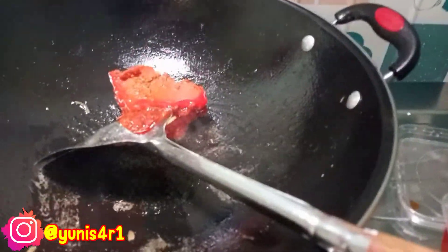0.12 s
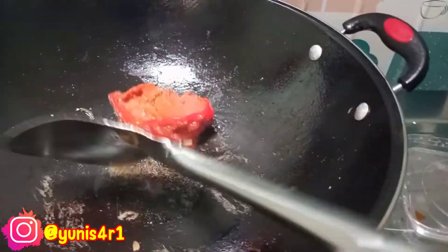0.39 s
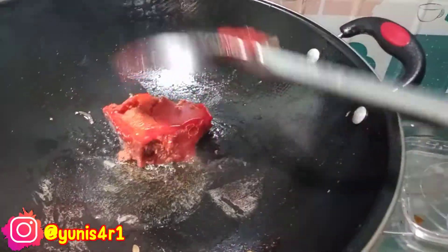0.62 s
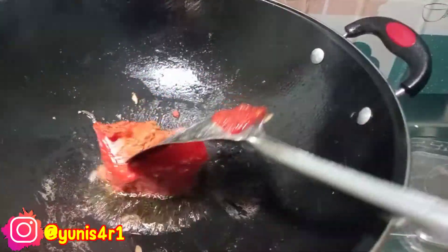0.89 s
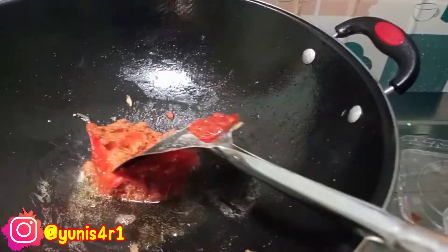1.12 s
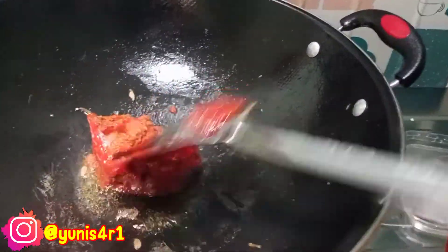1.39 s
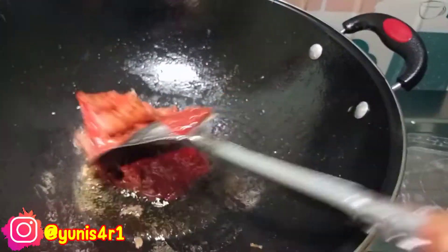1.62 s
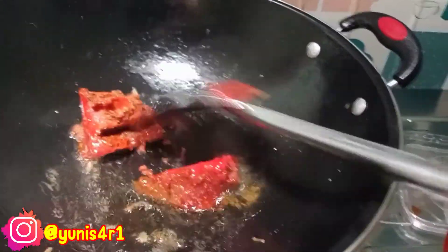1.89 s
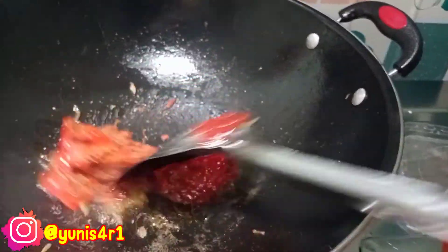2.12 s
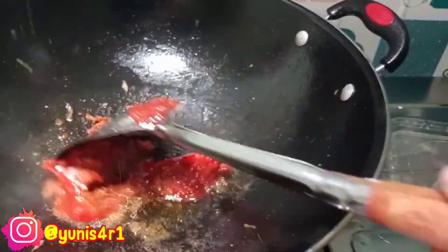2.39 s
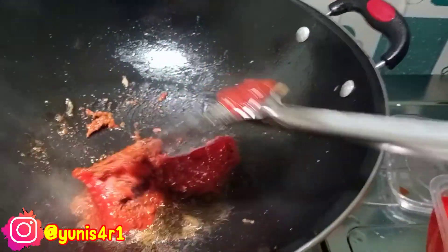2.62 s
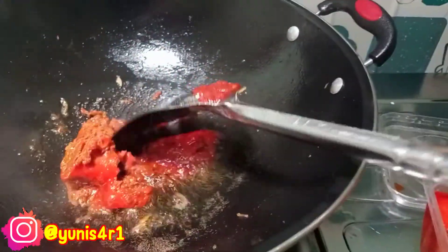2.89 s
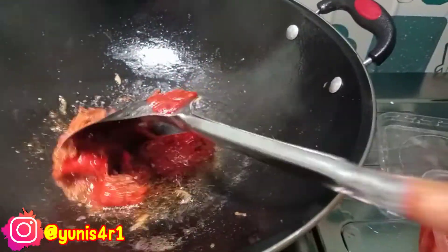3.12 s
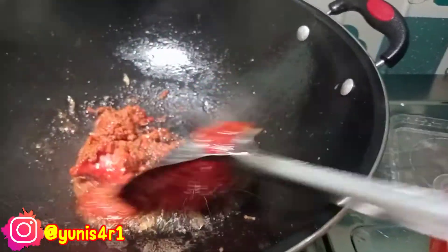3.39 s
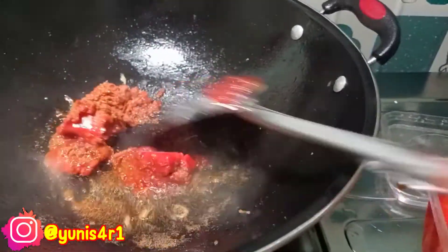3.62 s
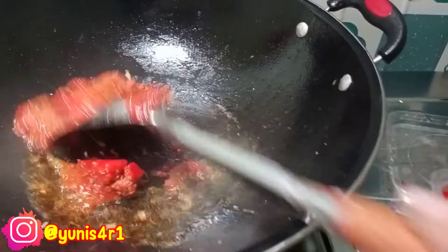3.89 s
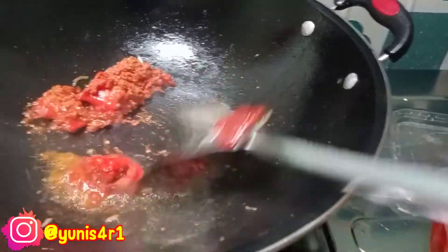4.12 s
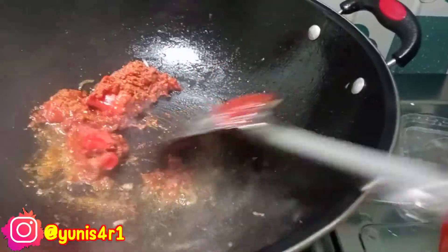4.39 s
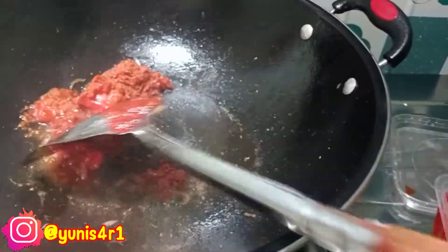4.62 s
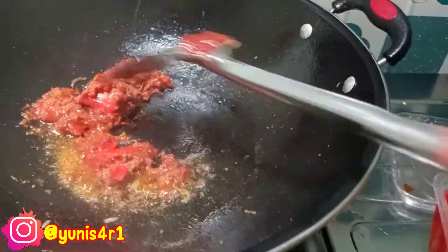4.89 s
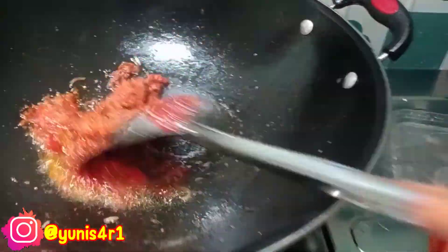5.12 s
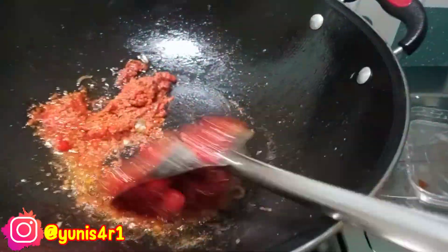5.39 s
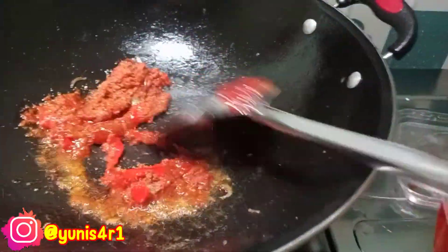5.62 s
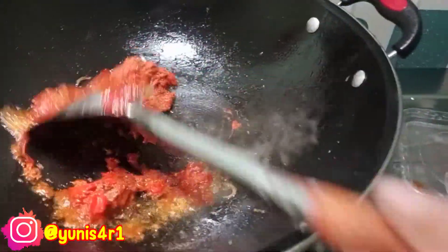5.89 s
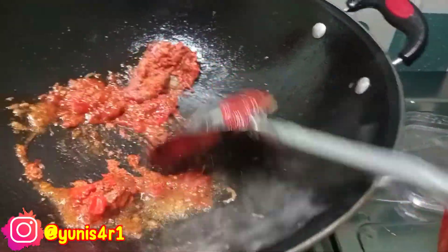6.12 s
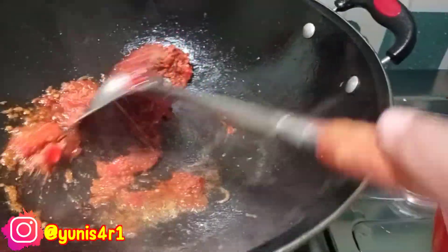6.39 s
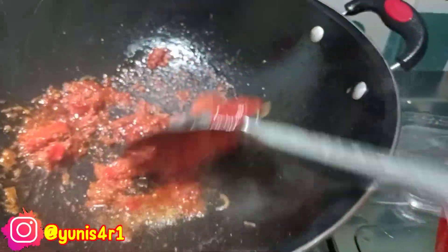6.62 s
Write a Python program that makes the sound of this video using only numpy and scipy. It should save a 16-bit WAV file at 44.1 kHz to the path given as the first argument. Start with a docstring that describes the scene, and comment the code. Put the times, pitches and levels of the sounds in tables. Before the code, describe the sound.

Wet spice paste fries hard in hot oil very close to a phone microphone, a dense bright hiss with sharp snapping spatters. A metal spatula scrapes in short gritty strokes that make the bubbling surge, and occasionally knocks the wok with a brief damped ring. The pan bumps softly on its stand; low burner rumble lies underneath in a small kitchen.

```python
"""Spice paste frying in a wok

Hot oil sizzles close to a phone microphone: noise and damped sines for bursting steam bubbles in three sizes,
with sharp noise cracks for spatters. A metal spatula scrapes coloured grit noise, squeaks, clanks and knocks
the ringing modes of a steel wok, which bumps on its stand. Puffs of steam and some loud spatters push the
microphone, and faint hums and burner rumble lie behind it all. The blows and spatters echo in a small kitchen."""
import sys
import numpy as np
from scipy import signal
from scipy.fft import rfft, irfft, next_fast_len
from scipy.io import wavfile
from scipy.ndimage import uniform_filter1d, minimum_filter1d, map_coordinates

SR = 44100
rng = np.random.default_rng(int(sys.argv[2]) if len(sys.argv) > 2 else 0)


def log_audio(samples):
    """Write samples as a 16-bit WAV file to the path given in sys.argv[1]."""
    # one column per channel
    frames = np.atleast_2d(samples).T
    # limit to full scale, then quantise
    limited = np.clip(frames, -1, 1)
    pcm = np.round(limited * 32767).astype(np.int16)
    wavfile.write(sys.argv[1], SR, pcm)


def volts_from_db(level):
    """Convert decibel levels to linear amplitude ratios."""
    exponent = np.asarray(level, float) / 20
    return 10 ** exponent


N = 298069  # length in samples

# Levels in the tables are relative: each source trims its own.
# Burner and kitchen noise over time: time_s, level_db
RUMBLE_LEVELS = [(0.0, -51), (0.56, -47), (1.39, -52), (2.05, -48), (2.8, -53.5), (3.54, -45), (4.1, -49.5),
                 (6.57, -48.5), (6.76, -53)]
# Colour of the burner and kitchen noise: frequency_hz, level_db
KITCHEN_COLOUR = [(24, -60), (45, -22.5), (234, -2), (355, -5), (406, 1.5), (470, -4), (734, 0.5),
                  (862, -5), (1000, 0), (1300, -8.5), (2200, -120)]
# Faint hums: start_s, length_s, pitch_hz, level_db
HUM_TONES = [(4.45, .09, 689, -38.5), (4.53, 0.24, 794, -44), (5.758, .1, 798, -45)]
# Kitchen reverberation: frequency_hz, t60_s
ROOM_DECAY = [(200, 0.65), (2000, 0.3), (10000, 0.063)]
# The wok rocks on its stand: start_s, level_db
ROCK_BUMPS = [(.363, -44), (.419, -47), (0.578, -41), (.799, -40), (2.124, -40), (2.994, -40), (3.145, -39),
              (3.327, -35.5), (3.42, -37), (3.697, -39), (3.823, -32.5), (4.317, -40), (4.474, -41),
              (4.851, -29), (5.181, -42), (5.622, -40), (5.83, -37), (6.112, -29), (6.34, -35),
              (6.423, -38), (6.551, -38)]
# Low pushes of air on the microphone: puffs of steam, and the low thump under some loud spatters (the shortest
# rows): start_s, level_db, scale_s (the first push lasts half of it)
MIC_PUFFS = [(0.384, -38, 0.0067), (2.257, -33, 0.006), (2.419, -23.5, 0.0046), (2.469, -37, 0.006),
             (3.402, -50, 0.006), (3.825, -33, 0.0044), (5.5795, -26.5, 0.0019), (5.7093, -27, 0.0022),
             (6.461, -27, 0.0012), (6.649, -17, 0.0043), (6.697, -30, 0.0015)]
# Modes of the wok: pitch_hz, level_db, t60_s
WOK_MODES = [(204, -19, .12), (245.4, -8.5, 0.8), (323, -5, 0.27), (357.4, -5.5, 0.25), (402, -6, 0.46),
             (544, -7.5, 0.28), (641, -5.5, 0.28), (718, -4.5, 0.22), (750, -8.5, 0.14), (925, -24, .15),
             (1155, -20, .12), (1340, -13, 0.089), (1410, -3, 0.096), (1634, -1, .08), (2738, 12.5, 0.052),
             (2980, -16, .06), (3400, 0, .05), (4250, 4, .04)]
# Spatula knocks: start_s, level_db, sharpness (0 blunt to 1 sharp)
SPATULA_KNOCKS = [(0.004, -29.5, 0.6), (0.237, -38, 0.7), (0.347, -38, 0.7), (1.132, -36, 0.9),
                  (1.244, -33, 0.5), (1.896, -37, 0.7), (1.989, -25, 0.6), (2.406, -19.5, 0.55),
                  (2.421, -28.5, 0.4), (2.78, -21.5, 0.3), (3.662, -31, 0.9), (3.868, -30, 0.4),
                  (4.759, -19.5, 0.4), (5.088, -37, 0.9), (5.445, -29.5, 0.8), (6.047, -37, 0.7),
                  (6.117, -28, 0.2)]
# Blade clanks, pitched by how the blade lies in the paste: start_s, level_db, lower_hz, upper_hz
BLADE_CLANKS = [(1.1343, -6.5, 2020, 3070), (2.4073, -3, 1920, 2380), (2.782, -0.5, 1535, 3230),
                (3.6603, -13.5, 1980, 2970), (4.7603, -3.5, 1650, 2780)]
# Strokes of the blade: start_s, hold_s, scrape_db, surge_db (swell of the coarse bubbling)
BLADE_STROKES = [(0.338, 0.039, -35, 2.5), (0.442, .075, -44, 2.5), (0.748, 0.034, -42, 4),
                 (0.8, 0.042, -29.5, 2), (1.116, 0.035, -43, 0), (1.282, 0.021, -49, 0.5),
                 (1.555, 0.027, -37, 1), (1.655, 0.076, -37, 4), (1.772, 0.076, -32, 3),
                 (2.074, 0.076, -40, 2), (2.788, 0.051, -48, 2.5), (3.327, 0.11, -35, 1),
                 (3.65, 0.037, -37, -1), (3.764, .14, -39, 0), (4.194, 0.054, -48, 2), (4.64, 0.14, -41, 2),
                 (5.162, 0.085, -34, 2), (5.38, 0.044, -40, 0.5), (5.75, 0.088, -37.5, 3),
                 (6.163, 0.13, -45, 3)]
# Short squeaks of the blade: start_s, level_db, pitch_hz
BLADE_SQUEAKS = [(1.809, -16, 1526), (4.415, -18, 1536), (5.797, -19, 1496)]
# Colour of the scrape: frequency_hz, level_db
SCRAPE_COLOUR = [(470, -39), (800, -22), (1170, -11), (1350, -13), (1520, -7.5), (2190, -8), (2400, -1.5),
                 (3120, -27.5), (5280, -120)]
# The loudest oil spatters: start_s, level_db, bubbling_part_db, spray_part_db
LOUD_SPATTERS = [(0.273, -8, -8, -21), (0.3375, -5, -20, -27), (0.39, -8, -6, -23), (0.4479, -7, -5, -25),
                 (0.579, -1, -16, -27), (0.6644, -7, -12, -24), (0.9347, -9, -2, -26),
                 (0.9941, -11, -19, -21), (1.2251, -6, -11, -20), (1.6344, -6, -16, -20),
                 (2.0902, -1, -7, -26), (2.2558, -6, -12, -24), (2.3007, -13, -7, -22),
                 (2.3785, -11, -18, -17), (2.4083, -11, -2, -23), (2.4692, -1, -8, -19),
                 (2.5104, -2, -9, -22), (2.6075, -4, -11, -23), (2.7257, -7, -11, -20),
                 (2.7823, -5, -1.5, -24), (2.806, -4, -10, -19), (3.0261, -10, -4, -22),
                 (3.0615, -13, -4, -24), (3.3824, -9, -18, -21), (3.6631, -6, -21, -20),
                 (3.7439, -10, -17, -17), (3.8708, -1, -14, -25), (4.76, -9, -9.5, -23),
                 (4.9683, -12, -18, -20), (4.9996, -9, -13, -25), (5.0664, -8, -12, -21),
                 (5.4336, -2, -13, -26), (5.5807, -9, -7, -22), (5.7094, -2.5, -11, -23),
                 (5.9548, -2, -24, -25), (6.064, -3, -20, -25), (6.1864, -1, -15, -25),
                 (6.393, -5.5, -13.5, -24), (6.4603, -4, -18, -13), (6.4974, -4, -22, -18),
                 (6.5184, -6, -17, -17), (6.542, 0, -22, -20), (6.6484, -2.5, -13, -25),
                 (6.6542, -5.5, -19, -20), (6.698, -4, -22, -19)]
# How hard each size of bubble fries: time_s, coarse_bubbling_db, fine_hiss_db, spray_db
FRY_LEVELS = [(0.0, -19, -21, -29), (0.02, -19.5, -21, -32), (0.49, -20, -22, -32),
              (1.24, -22, -24.5, -33.5), (1.52, -22, -24.5, -35), (1.65, -19, -19, -31),
              (1.81, -25, -21.5, -32), (1.92, -20, -19.5, -25), (2.16, -18.5, -17.5, -26.5),
              (2.33, -20.5, -19.5, -29), (2.37, -23, -24.5, -32), (2.86, -23, -20, -28),
              (3.11, -25, -24.5, -32), (3.5, -20, -18, -28.5), (3.84, -23, -19, -25),
              (3.88, -23, -21.5, -33), (4.18, -23, -23, -30), (4.25, -23, -23, -35),
              (4.59, -23, -20.5, -29), (4.89, -25.5, -23.5, -32.5), (5.18, -25, -25, -36),
              (5.33, -20.5, -20, -30), (5.48, -22, -17.5, -28), (5.74, -25, -24, -32),
              (5.85, -23.5, -20.5, -31), (6.65, -29, -24.5, -35), (6.7, -25.5, -24, -30),
              (6.76, -27.5, -25, -30)]
# Colour of the coarse bubbling: frequency_hz, level_db
BUBBLING_COLOUR = [(1180, -38), (2000, -12.5), (3300, 1.5), (4140, -2), (5050, -13), (5600, -14),
                   (7280, -14.5), (12300, -120)]
# Colour of the fine hiss: frequency_hz, level_db
HISS_COLOUR = [(2940, -32.5), (5000, -24), (5910, -12), (8230, 1), (11500, -15.5), (15000, -45),
               (22000, -120)]
# Colour of the spray: frequency_hz, level_db
SPRAY_COLOUR = [(6500, -34), (11000, 7.5), (12800, 3.5), (14900, 9), (15450, 13), (15600, -60),
                (22000, -67)]


def unit(x):
    """Scale to rms 1."""
    return x / np.sqrt(np.mean(x ** 2) + 1e-20)


def along(points, hz):
    """Read a (frequency_hz, value) curve on a log frequency axis."""
    f, v = np.transpose(points)
    return np.interp(np.log(hz + 1), np.log(f + 1), v)


def curves(rows):
    """One value per sample for each column after the time."""
    s, *columns = np.transpose(rows)
    return [np.interp(np.arange(N) / SR, s, column) for column in columns]


def wobble(rate):
    """A smooth random curve with this many knots a second."""
    knots = rng.standard_normal(int(N * rate / SR) + 4)
    return map_coordinates(knots, [np.arange(N) * rate / SR])


def coloured(x, spectrum):
    """Shape x with a causal minimum-phase filter that leaves the power of white noise as it is."""
    m = 2 * next_fast_len(N // 2 + 4096)
    gain = np.maximum(volts_from_db(along(spectrum, np.fft.rfftfreq(m, 1 / SR))), 1e-4)
    cepstrum = irfft(np.log(unit(gain)), m)
    # folding the cepstrum forward makes the filter causal
    cepstrum[1:m // 2] *= 2
    cepstrum[m // 2 + 1:] = 0
    return irfft(rfft(x, m) * np.exp(rfft(cepstrum)), m)[:N]


def bubbles(low_hz, high_hz, cycles, spread_db, count):
    """Bursting bubbles: damped sines of random pitch, mostly small, a few large."""
    when, pitch, size = rng.random((count, 3)).T
    hz = low_hz * (high_hz / low_hz) ** pitch
    t = np.arange(int(3 * cycles / low_hz * SR)) / SR
    turns = np.outer(hz, t)
    loudness = hz * volts_from_db(-spread_db * np.log(1 - .98 * size))  # the factor hz keeps the sum white
    grains = loudness[:, None] * np.sin(2 * np.pi * turns) * np.exp(-2 * turns / cycles)
    at = (when * N).astype(int)[:, None] + np.arange(len(t))
    return unit(np.bincount(at.ravel(), grains.ravel())[:N])


def froth(patchy_db):
    """White noise with patches of random gain: the bubbles too many to tell apart."""
    z = signal.stft(rng.standard_normal(N), nperseg=256)[2]
    field = uniform_filter1d(rng.standard_normal(z.shape), 5, 0)  # smooth over frequency
    field = uniform_filter1d(field, 9, 1)  # then over time
    return unit(signal.istft(z * volts_from_db(patchy_db * unit(field)), nperseg=256)[1][:N])


def place(times, sounds):
    """Sum of the sounds, each starting at its time."""
    out = np.zeros(N + SR)
    for s, sound in zip(times, sounds):
        out[round(s * SR):][:len(sound)] += sound
    return out[:N]


def rumble():
    """Burner and kitchen noise: patchy noise, strongest in the lows and mids, with an uneven level."""
    level_db = curves(RUMBLE_LEVELS)[0] + 3 + 0.84 * wobble(4.1) + 2.24 * wobble(12)
    return volts_from_db(level_db) * unit(coloured(froth(1.3), KITCHEN_COLOUR))


def hums():
    """Faint steady sines that swell and stop."""
    t = np.arange(N) / SR
    fade_s = 0.034
    mix = 0
    for s, length, hz, db in HUM_TONES:
        shape = np.clip(np.minimum(t - s, s + length - t) / fade_s, 0, 1)
        mix = mix + volts_from_db(db) * shape * np.sin(2 * np.pi * hz * t)
    return mix


def kitchen(x):
    """Echo from the walls: a noise tail in which each frequency dies at its own speed."""
    hz, t, z = signal.stft(rng.standard_normal(SR // 2), SR, nperseg=256)
    fading = volts_from_db(-60 * t / along(ROOM_DECAY, hz)[:, None])
    tail = signal.istft(z * fading, SR, nperseg=256)[1]
    delayed = np.pad(x, (250, 0))  # samples before the first echo
    return signal.fftconvolve(delayed, tail / np.linalg.norm(tail))[:N]


def rocking():
    """Soft bumps against the stand ring one low mode, its pitch a little different each time."""
    t = np.arange(SR // 3) / SR
    mode_hz, scatter_hz, t60_s, rise_s = 242, 6.1, 0.15, 0.0085
    bumps = []
    for _, db in ROCK_BUMPS:
        shape = volts_from_db(db + 4.5 - 60 * t / t60_s) * (1 - np.exp(-t / rise_s))
        bumps.append(shape * np.sin(2 * np.pi * rng.normal(mode_hz, scatter_hz) * t))
    return place(np.transpose(ROCK_BUMPS)[0], bumps)


def puffs():
    """Steam, or a loud spatter, gives the microphone a low push of air, then a slower, dying rebound."""
    t = np.arange(SR // 10) / SR
    pushes = []
    for _, db, scale in MIC_PUFFS:
        swing = np.sin(np.pi * np.sqrt(2 * t / scale))
        pushes.append(volts_from_db(db + 3.5) * swing * np.exp(-t / (0.6 * scale)))
    return place(np.transpose(MIC_PUFFS)[0], pushes)


def knocks():
    """Every blow rings the wok's modes at new strengths; a blunt blow leaves the upper modes weak."""
    t = np.arange(SR // 2) / SR
    hz, level, t60 = np.transpose(WOK_MODES)[:, :, None]
    rise = 1 - np.exp(-t / 0.0016)
    rings = []
    for _, db, sharp in SPATULA_KNOCKS:
        tilt_db = -9 * (1 - sharp) * np.log2(np.maximum(hz / 800, 1))
        strengths = db - 13.5 + level + tilt_db + rng.normal(0, 1.86, hz.shape)
        fading = volts_from_db(-60 * t / t60) + 4.6 * volts_from_db(-60 * t / 0.033)  # the paste damps the first swing fast
        modes = volts_from_db(strengths) * fading * np.sin(2 * np.pi * hz * t)
        rings.append(np.sum(modes, axis=0) * rise)
    return place(np.transpose(SPATULA_KNOCKS)[0], rings)


def clanks():
    """The blade itself clanks with some of the knocks: two tones that die together."""
    t = np.arange(SR // 20) / SR
    fading = volts_from_db(-60 * t / .03)  # t60 of 30 ms
    rings = []
    for _, db, low_hz, high_hz in BLADE_CLANKS:
        tones = 0.46 * np.sin(2 * np.pi * low_hz * t) + np.sin(2 * np.pi * high_hz * t)
        rings.append(volts_from_db(db - 6.5) * fading * tones)
    return place(np.transpose(BLADE_CLANKS)[0], rings)


def strokes():
    """Scrape gain and surge of the bubbling in dB: each stroke rises, holds and lets go."""
    attack_s, release_s = 0.0082, 0.053
    gain, surge_db, t = 0, 0, np.arange(N) / SR
    for s, hold, db, stroke_surge_db in BLADE_STROKES:
        shape = np.interp(t, s + np.cumsum([0, attack_s, hold, release_s]), [0, 1, 1, 0])
        gain = gain + shape * volts_from_db(db)
        surge_db = surge_db + shape * stroke_surge_db
    return gain, surge_db


def squeaks():
    """Short swelling tones of the blade with a wandering phase."""
    t = np.arange(SR // 10) / SR
    swell = np.exp(-((t - .012) / 0.01) ** 2)
    tones = []
    for _, db, hz in BLADE_SQUEAKS:
        wander = 0.67 * np.cumsum(rng.normal(0, 0.037, len(t)))  # radians
        tones.append(volts_from_db(db - 11.5) * swell * np.sin(2 * np.pi * hz * t + wander))
    return place(np.transpose(BLADE_SQUEAKS)[0], tones)


def scrape():
    """The blade drags grit over the steel in clumps; a bed of grit follows the coarse bubbling."""
    grit = froth(1.0) + 0.25 * bubbles(818, 2486, 4.7, 4.4, count=3000)
    bed = volts_from_db(curves(FRY_LEVELS)[0] - 13.5 + 1.4 * wobble(12))
    gain = (bed + strokes()[0]) * volts_from_db(0.63 * wobble(30))
    return gain * unit(coloured(grit, SCRAPE_COLOUR)) + squeaks()


def spatters():
    """Each drop of water bursts in a crack of a few milliseconds, coloured like the sizzle and the scrape."""
    # 60 small spatters at random times join the loud ones
    scatter_db = 3.5 * rng.standard_normal(size=(60, 4))
    small = [0, -9.5, -12, -18] + scatter_db  # columns as in LOUD_SPATTERS
    small[:, 0] = rng.random(len(small)) * N / SR
    s, db, low_db, high_db = np.transpose([*LOUD_SPATTERS, *small])
    fading = volts_from_db(-60 * np.arange(SR // 100) / SR / 0.0044)  # t60 of 4.4 ms
    cracks = fading * rng.standard_normal((len(s), len(fading)))
    # every crack gets the same energy before its level
    cracks *= np.linalg.norm(fading) / np.linalg.norm(cracks, axis=1, keepdims=True)
    parts = [(db + low_db + 8.0, BUBBLING_COLOUR), (db - 4.0, HISS_COLOUR),
             (db + high_db + 10.0, SPRAY_COLOUR), (db + low_db - 7.5, SCRAPE_COLOUR)]
    return sum(coloured(place(s, volts_from_db(level)[:, None] * cracks), colour) for level, colour in parts)


def sizzle():
    """Three sizes of bubbles over froth; broadband cracks and a common flicker tie the sizes together."""
    bubbling_db, hiss_db, spray_db = curves(FRY_LEVELS)
    surge_db = strokes()[1]
    cracks = np.zeros(N)
    at, size, sign = rng.random((1500, 3)).T
    cracks[(at * N).astype(int)] = volts_from_db(-5.5 * np.log(1 - .985 * size)) * np.sign(sign - .5)
    cracks = unit(cracks)
    flicker_db = 0.44 * wobble(25) + 0.47 * wobble(90)
    coarse = froth(1.5) + 0.38 * bubbles(2010, 5800, 6.0, 3.24, count=9000) + 0.29 * cracks
    fine = froth(1.63) + 0.36 * bubbles(4600, 11050, 6.2, 4.4, count=12000) + 0.23 * cracks
    spray = froth(1.9) + 0.96 * bubbles(11900, 15800, 6.1, 3.4, count=12000) + 0.23 * cracks
    dull = unit(coloured(coarse, BUBBLING_COLOUR))
    sharp = unit(-np.gradient(np.gradient(dull)))  # the same bubbles tilted to the treble
    # the share of small, bright bubbles drifts and shrinks as a stroke makes the bubbling surge
    bright = np.clip(0.27 + 0.24 * wobble(6.13) - 0.1 * surge_db, 0, 1)
    bubbling = (1 - bright) * dull + bright * sharp
    return (volts_from_db(bubbling_db + surge_db - 0.12 + flicker_db) * bubbling
            + volts_from_db(hiss_db - 0.12 + flicker_db) * unit(coloured(fine, HISS_COLOUR))
            + volts_from_db(spray_db + 0.4 + flicker_db) * unit(coloured(spray, SPRAY_COLOUR)))


def scene():
    """All sources at one microphone; only the blows, bumps and spatters echo in the kitchen."""
    blows = knocks() + clanks() + spatters() + rocking()
    echo = volts_from_db(-10) * kitchen(blows)
    return (blows + echo + sizzle() + scrape() + puffs() + hums() + rumble())[None]


def band_limit(x):
    """A steep low-pass at the top of the band."""
    return signal.sosfilt(signal.butter(12, 16850, fs=SR, output="sos"), x)


def record(dry):
    """The phone cuts the deep bass; its limiter ducks everything for a moment around and after a loud crack."""
    dry = signal.lfilter(*signal.butter(1, 60, "high", fs=SR), dry)
    need = np.minimum(1, .8 / (np.abs(dry) + 1e-9))  # gain that keeps each sample below 0.8
    held = minimum_filter1d(need, size=301, origin=100)  # the hold reaches mostly past the peak
    gain = uniform_filter1d(held, size=101)
    return band_limit(dry * gain)


dry = scene()
out = record(dry)
log_audio(out)
```